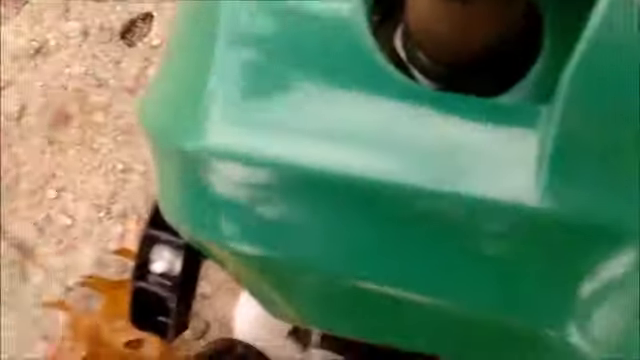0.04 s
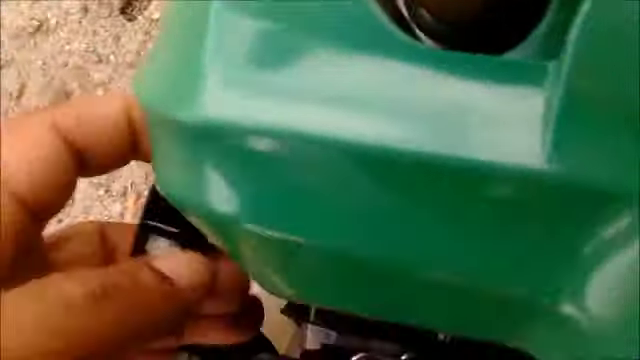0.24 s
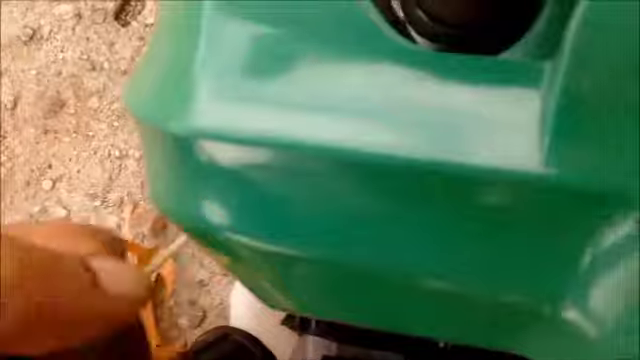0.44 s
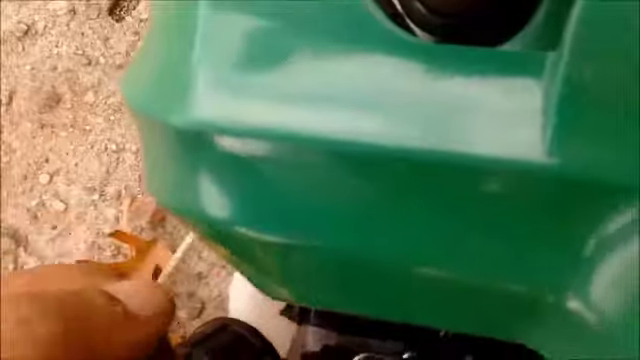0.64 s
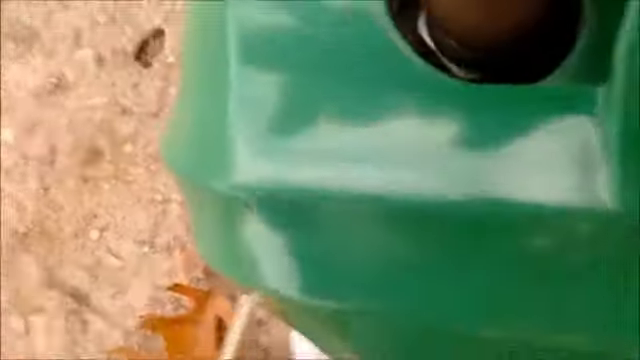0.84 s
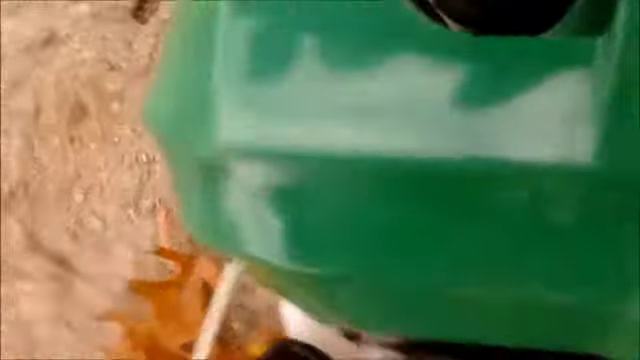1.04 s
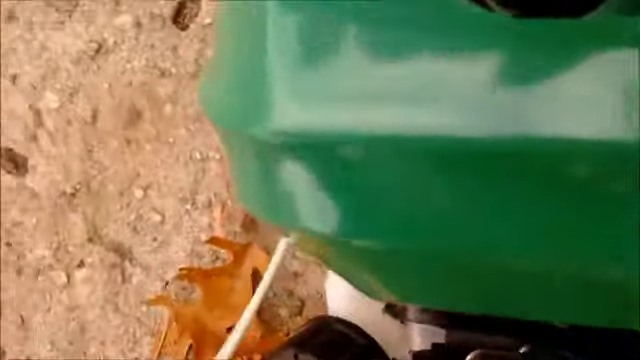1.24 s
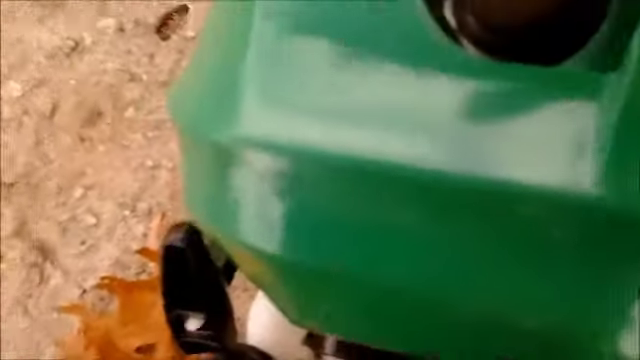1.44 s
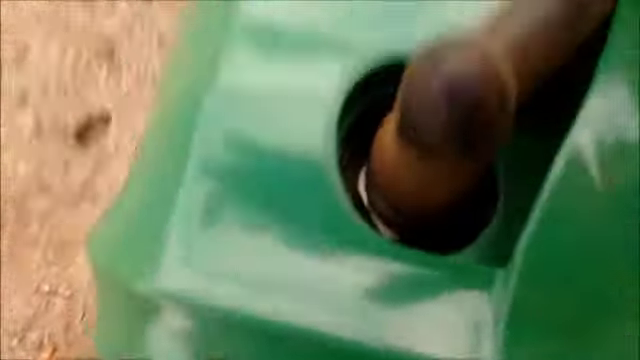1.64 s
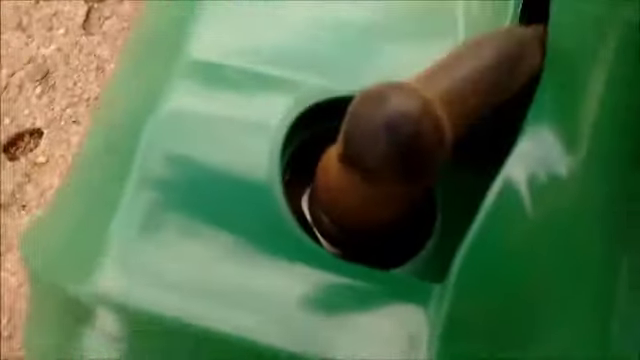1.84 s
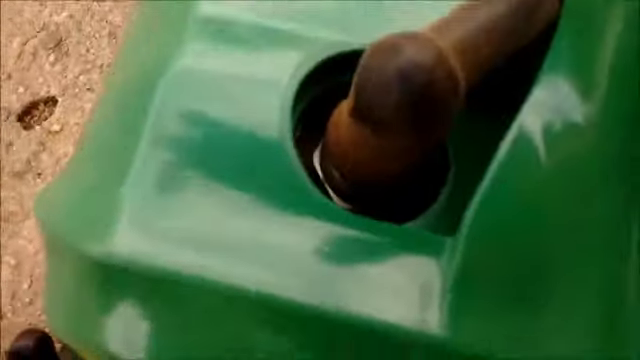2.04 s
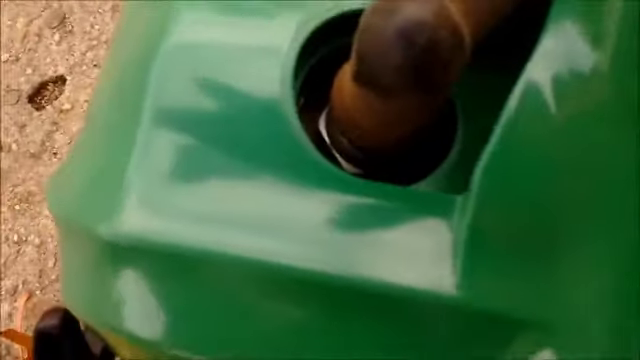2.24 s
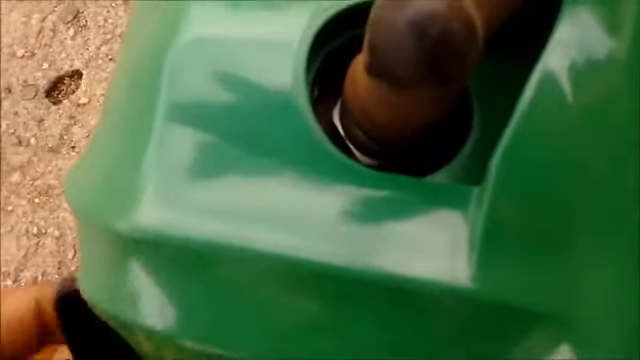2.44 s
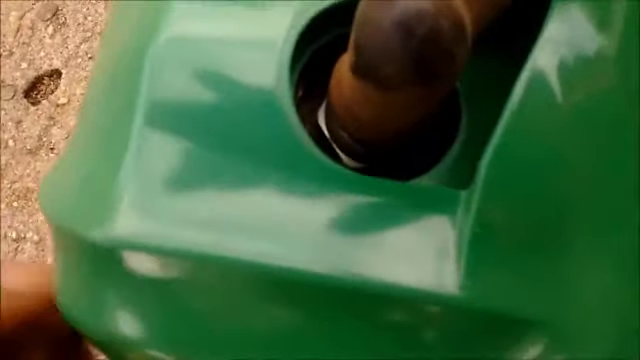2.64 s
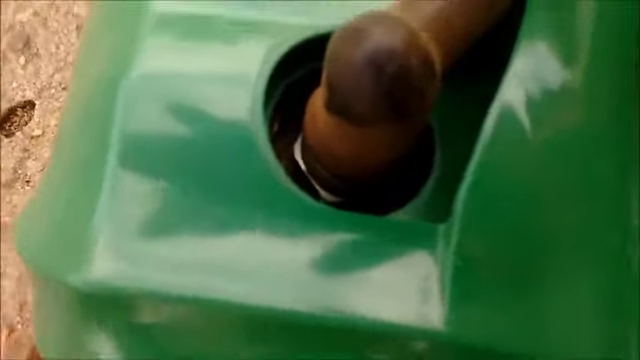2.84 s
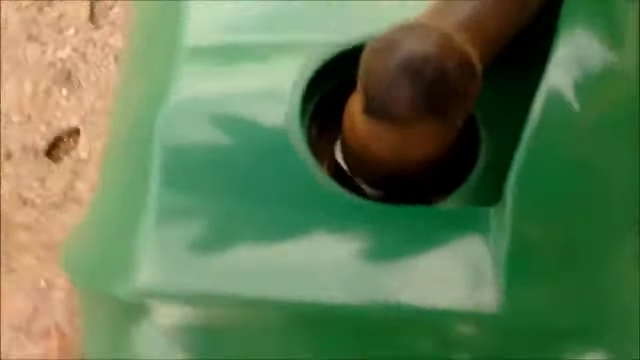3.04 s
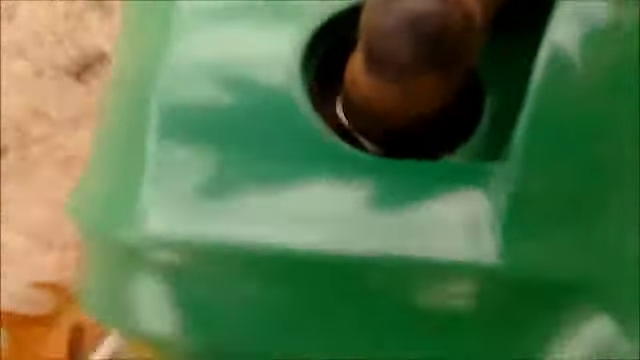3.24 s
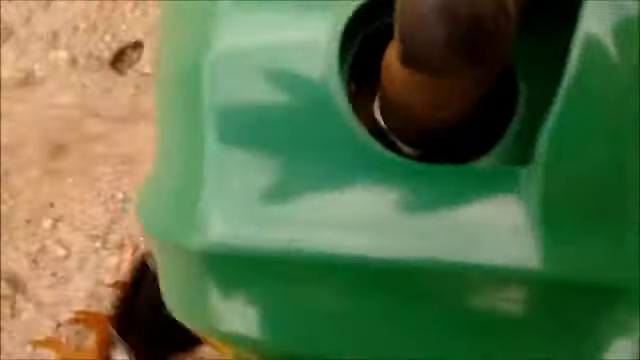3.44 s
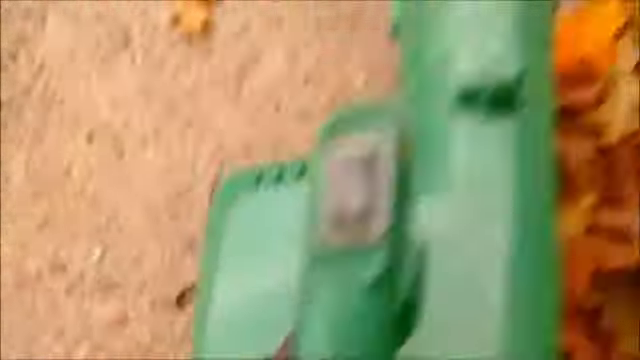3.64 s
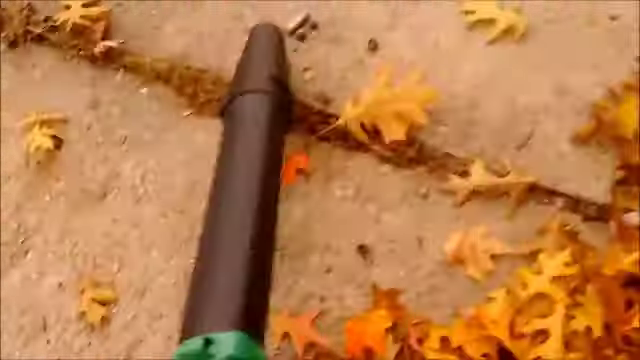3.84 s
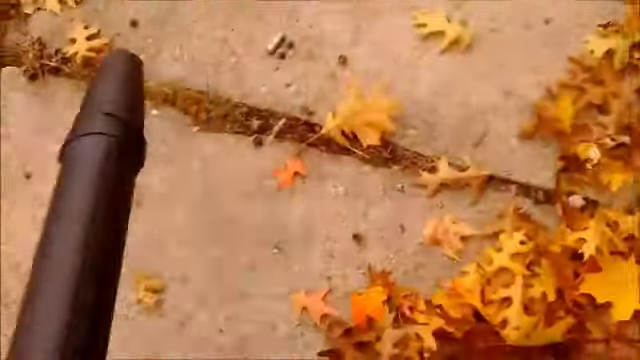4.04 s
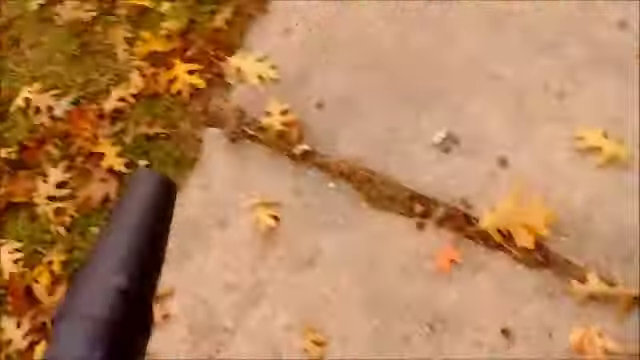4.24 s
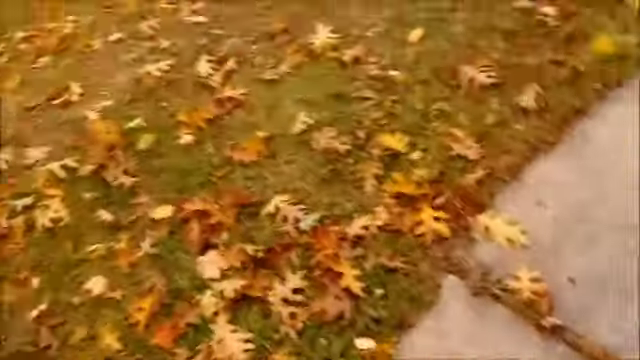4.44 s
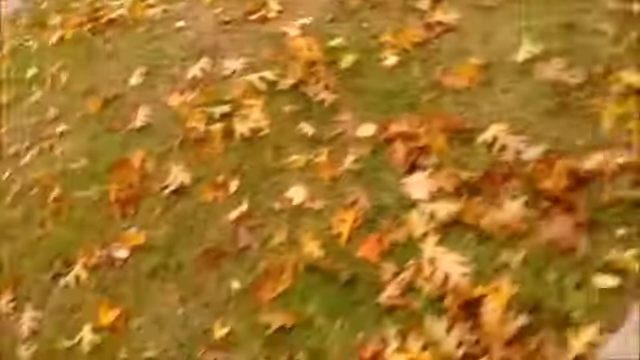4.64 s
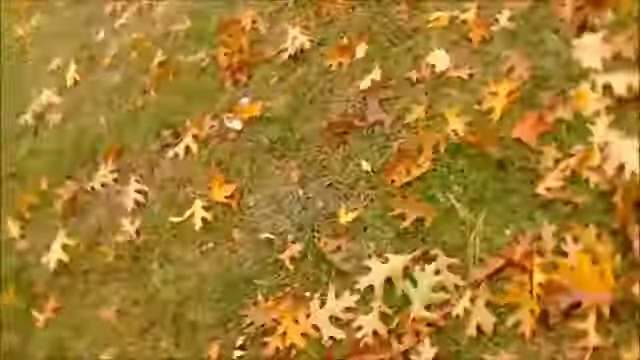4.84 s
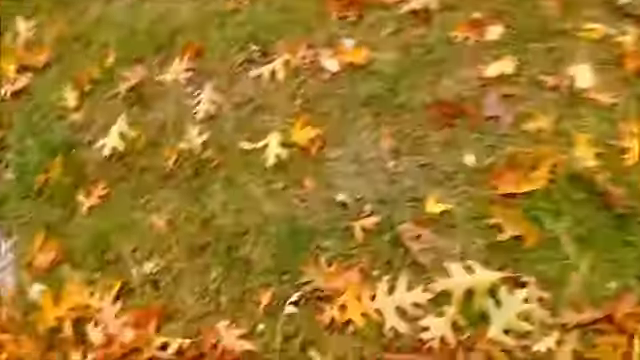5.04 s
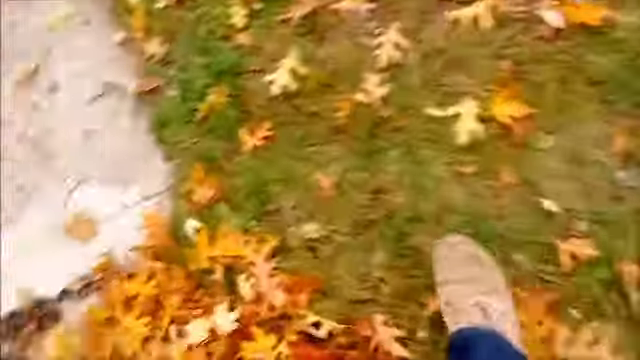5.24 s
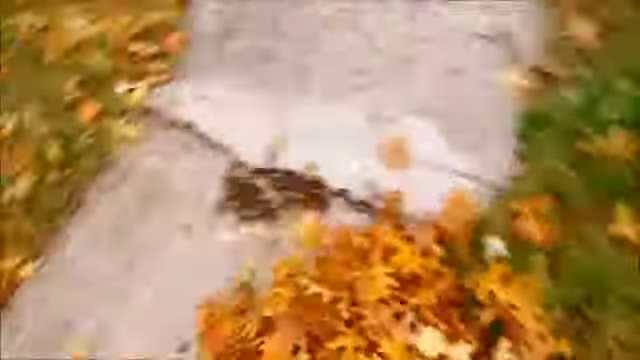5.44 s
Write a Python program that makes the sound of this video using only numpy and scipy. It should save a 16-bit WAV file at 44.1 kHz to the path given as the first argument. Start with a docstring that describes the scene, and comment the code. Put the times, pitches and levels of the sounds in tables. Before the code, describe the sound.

Plastic knocks, a ratcheting starter cord that coasts out and rewinds, then a second pull fires a small engine that climbs to a buzzing roar.

```python
"""Pull-starting a leaf blower

A small two-stroke leaf blower is pull-started on a concrete path, heard from very close.
A hand rubs the casing and takes the grip; the first pull spins the crank, which coasts to a stop while the
cord rewinds; the second pull catches, the engine stumbles, then revs up with its fan. A breeze buffets the
microphones. Pulses and blows ring resonances; air, rubbing and wind are shaped noise; the hum is sines."""
import sys
import numpy as np
from scipy import signal
from scipy.fft import rfft, irfft, next_fast_len
from scipy.io import wavfile
from scipy.ndimage import uniform_filter1d, map_coordinates

SR = 44100
rng = np.random.default_rng(int(sys.argv[2]) if len(sys.argv) > 2 else 0)


def wrap_up_sound(samples):
    """Save the sound to the file named by the first command line argument, as 16-bit audio."""
    columns = np.atleast_2d(samples).T
    # keep every value between -1 and 1, then stretch to whole-number steps
    tamed = np.clip(columns, -1, 1)
    steps = np.round(tamed * 32767).astype(np.int16)
    wavfile.write(sys.argv[1], SR, steps)


N = 242550   # samples, 5.5 s

# Crank speed, one list for each pull, its first row falling on a port opening.
# Each row: time in seconds, speed in turns per second.
CRANK = [
    [(1.191, 42), (1.26, 37), (1.35, 36), (1.43, 31), (1.585, 28)],
    [(3.167, 40), (3.34, 42), (3.433, 44), (3.562, 49), (3.756, 54), (4.072, 60), (4.152, 64), (4.212, 70),
     (4.35, 75.5), (4.45, 78), (4.65, 81.8), (4.85, 84.5), (4.95, 81.5), (5.05, 79.5), (5.15, 79),
     (5.25, 75.7), (5.5, 71.5)],
]
# Single low thumps: slow turns of the crank, starts and stops of a pull, and one late gust-like thud.
# Each row: time in seconds, strength of the pulse in dB.
LOW_THUMPS = [(0.983, 6), (1.019, 7), (1.067, -1), (1.118, -11), (1.168, -1), (1.481, 10), (1.658, -12),
              (1.753, -8.5), (1.867, -9), (1.981, -5.5), (2.113, -5), (2.205, -11), (3.096, 6.5),
              (3.137, -7), (5.397, -1)]
# The two pulls on the cord. Each row: second of full load, second of the cord stop, rumble level in dB,
# roar level in dB, hiss level in dB.
PULLS = [(1.038, 1.498, -20.5, -19, -19.5), (3.132, 3.54, -18.5, -23, -19.5)]
# Three settings of the exhaust pulses, each for the crank pulled, coasting and firing, in dB:
# strength, unevenness from turn to turn, and how far strong and weak turns alternate.
PULSE_DB = (-3, -10, -14)
UNEVEN_DB = (1.5, 1, 3.3)
ALTERNATE_DB = (0, 0, 3.5)


def port_openings():
    """One click per crank turn, as the piston uncovers the exhaust port, and one for each single low thump."""
    t = np.arange(N) / SR
    # 0 is pulled, 1 is coasting, 2 is firing
    state = np.select([t > PULLS[1][1], t > PULLS[1][0], t > PULLS[0][1]], [2, 0, 1], 0)
    strength_db, uneven_db, alternate_db = (np.take(db, state) for db in (PULSE_DB, UNEVEN_DB, ALTERNATE_DB))
    clicks, chance = np.zeros(N), rng.standard_normal(N)
    for rows in CRANK:
        turns = np.cumsum(in_time(rows, 0)[0]) / SR
        at = np.flatnonzero(np.diff(np.ceil(turns))) + 1
        strong_weak = (-1) ** np.arange(len(at))
        by_chance = uneven_db[at] * np.clip(chance[at], -2, 1)
        clicks[at] = from_db(strength_db[at] + by_chance + alternate_db[at] * strong_weak)
    for s, db in LOW_THUMPS:
        clicks[round(s * SR)] = from_db(db)
    return clicks


# Resonances of the muffler. Each row: pitch in Hz, width in Hz, level in dB before a shared 4 dB cut.
MUFFLER = [(160, 90, -2), (250, 130, -1), (420, 160, -12), (580, 200, -11)]
# Tone of the hissing air. Each row: frequency in Hz, relative strength in dB per Hz.
AIR_COLOUR = [(580, -13.5), (900, -9.5), (1600, -7.5), (3200, -13.5), (5000, -15), (8000, -22.5),
              (15000, -34)]
# Tone of the roar. Each row: frequency in Hz, relative strength in dB per Hz.
ROAR_COLOUR = [(40, -21), (120, 1.5), (220, 1.5), (400, -3.5), (600, -3.5), (900, -12)]
TURN_THROB, TURN_THROB_S = .9, .003   # each port opening pushes the hiss up: added gain, decay time


def engine(clicks):
    """Port pulses ring the muffler, each with a spit of hiss; the air flow throbs with the turns."""
    opening = uniform_filter1d(clicks, size=25)   # the port takes about half a millisecond to open
    thump = sum(from_db(db - 4) * ring(-opening, hz, 2.2 / width) for hz, width, db in MUFFLER)
    thump = signal.lfilter(*signal.butter(2, 110, "high", fs=SR), thump)   # a small outlet radiates little bass

    spit_gain = signal.lfilter([1], [1, -np.exp(-1 / (0.0015 * SR))], clicks)
    spit = from_db(-31.0) * spit_gain * coloured(rng.standard_normal((2, N)), AIR_COLOUR)

    push = signal.lfilter([TURN_THROB], [1, -np.exp(-1 / (TURN_THROB_S * SR))], clicks > 0)
    throb = from_db(1.2 * drift(10) + 1.5 * drift(100)) * (.8 + push)
    roar_gain, hiss_gain = air_flow()
    opposed = 0.88 * rng.standard_normal(N) * [[1], [-1]]   # turned over at the second port
    roar_noise = coloured(rng.standard_normal((2, N)) + opposed, ROAR_COLOUR)
    roar = roar_gain * from_db(2.5 * drift(9)) * roar_noise
    hiss = hiss_gain * throb * coloured(grainy(9000, 1.9), AIR_COLOUR)
    return thump * [[1], [-.8]] + hum() + spit + roar + hiss


# Level of each multiple of the crank speed, in dB, in a plain list from the first multiple up.
HUM_ORDERS_DB = [-9, -2, -3, -14, -11, -14, -7, -9, -9, -6, -9, -8, -11, -10, -11, -12]
HUM_DB, HUM_TURNS_PER_S = -31, 80   # level of the hum at this crank speed
HUM_DB_PER_TURN = .7   # gain in dB for each turn per second more
HUM_PORT_STEP = .009   # radians, times the multiple squared, by which the ports come into step


def hum():
    """Clean multiples of the crank speed, each swelling and sinking on its own; louder as the speed rises."""
    speed, = in_time(CRANK[1], 0)
    angle = 2 * np.pi * np.cumsum(speed * (1 + .006 * drift(12))) / SR   # the speed wavers a little
    swing = [from_db(db + 5 * drift(8)) for db in HUM_ORDERS_DB]
    tones = np.zeros((2, N))
    for k, gain in enumerate(swing, start=1):
        port_phase = [[0], [np.pi - k ** 2 * HUM_PORT_STEP]]
        tones += gain * np.sin(k * angle + rng.uniform(0, 2 * np.pi) + port_phase)
    return from_db(HUM_DB + HUM_DB_PER_TURN * (speed - HUM_TURNS_PER_S)) * tones


# Fan and turbulent exhaust flow once the engine fires.
# Each row: time in seconds, roar level in dB, hiss level in dB.
AIR = [(3.55, -21.5, -23), (3.7, -28, -26.5), (3.95, -58, -38), (4.3, -55, -28.5), (4.5, -24.5, -26.5),
       (4.7, -27, -24.5), (4.85, -31, -25.5), (5.0, -29.5, -29), (5.2, -23.5, -27), (5.5, -22, -27.5)]
# Air while the crank coasts. One row: roar level in dB, hiss level in dB, fading of the hiss in dB per second.
COAST = (-39.5, -37.5, 8)


def air_flow():
    """Gains of roar and hiss: air moves while the cord is pulled, while coasting, then while firing."""
    roar_db, hiss_db, fading = COAST
    roar, hiss = from_db(in_time(AIR, -99))
    roar = roar + pulled(column=3, sag=9.9) + coasting(roar_db)
    hiss = hiss + pulled(column=4, sag=13.8) + coasting(hiss_db, fading)
    return roar, hiss


PULL_RISE_DB_PER_S = 295
CUT_DB_PER_S = 600   # how fast a pull ends and the next phase sets in


def pulled(column, sag):
    """Gain of one level column of the pulls, sagging in dB per second until the cord stops."""
    return sum(swell(row[0], row[1], row[column], PULL_RISE_DB_PER_S, CUT_DB_PER_S, sag) for row in PULLS)


COAST_END_S = 2.22   # after the first pull the crank coasts and the cord rewinds until then


def coasting(db, fading=0):
    """Gain of a layer that lasts from the first cord stop until the crank rests."""
    return swell(PULLS[0][1], COAST_END_S, db, CUT_DB_PER_S, CUT_DB_PER_S / 2, fading)


# Short bright puffs of air, during the pulls and the slow turns between.
# Each row: second of the loudest moment, level in dB.
PUFFS = [(1.09, -23), (1.33, -28), (1.635, -34), (1.728, -30.5), (1.836, -25.5), (1.951, -25.5),
         (2.08, -24), (2.146, -23), (3.152, -20.5), (3.251, -20), (3.329, -26), (3.398, -24), (3.46, -22.5)]
# Tone of the puffs. Each row: frequency in Hz, relative strength in dB per Hz.
PUFF_COLOUR = [(3000, 4), (5000, 10.5), (8000, 11.5), (11000, 5), (15000, 2)]
PUFF_S = 0.0094   # half length of a puff


def puffs():
    """Short bright puffs of air, each a smooth swell of grainy noise."""
    t = np.arange(N) / SR
    puff_gain = sum(from_db(db) * np.exp(-((t - s) / PUFF_S) ** 2) for s, db in PUFFS)
    return puff_gain * coloured(grainy(14000, 0.71), PUFF_COLOUR)


# Resonances of the casing. Each row: pitch in Hz, level in dB, free decay by 60 dB in seconds.
CASING = [(820, -5, 0.037), (1186.4, -5.5, 0.084), (1389, -10, 0.075), (1404, -12, 0.15), (1667, -1, 0.019),
          (2076, -13, 0.11), (2690, -4, 0.055), (3400, -15, 0.049), (4580, -10, 0.035)]
# Resonances of the spring. Each row: pitch in Hz, level in dB, free decay by 60 dB in seconds.
SPRING = [(4520, -2, 0.038), (4740, -5, 0.14), (4906, 1.5, 0.029), (4954, -8, 0.05), (5260, 0.5, 0.032)]
# Tone of the whirr. Each row: frequency in Hz, relative strength in dB per Hz.
WHIRR_COLOUR = [(2500, 10), (3600, 14), (4700, 9.5), (5200, 18), (6200, -2), (8500, 8.5), (11000, 4.5),
                (15000, -53)]
# Short bright slips of pawl and spring, during the rewind and around the second pull.
# Each row: time in seconds, peak level in dB, pitch in Hz.
SLIPS = [(1.628, -31.5, 4550), (1.707, -37, 4760), (1.779, -27.5, 4440), (1.827, -37, 4580),
         (1.889, -27, 5160), (1.923, -37, 5070), (1.943, -36, 5070), (2.0109, -26.5, 5300),
         (2.04, -29, 4360), (2.056, -32, 4700), (2.077, -24.5, 4630), (2.142, -22, 4600),
         (2.231, -33.5, 4700), (2.791, -40.5, 5100), (2.8013, -37, 4500), (3.0563, -16, 4970),
         (3.1178, -18, 4800), (3.1508, -26, 4900)]
# The ratchet catches and jars the casing.
# Each row: time in seconds, peak level in dB, pitch of the part struck in Hz.
CATCHES = [(1.054, -11, 1470), (1.112, -10, 850), (1.135, -8.5, 844), (1.161, -10, 780), (1.183, -8.5, 785),
           (1.202, -15, 1370), (1.231, -18, 1180), (1.256, -16.5, 1200), (1.277, -27, 1190),
           (1.336, -7.5, 1310), (1.37, -11.5, 825), (1.44, -19, 1230), (1.536, -25, 1420),
           (1.746, -31, 1440), (1.814, -24.5, 1400), (1.926, -22.5, 1400), (1.944, -22, 1390),
           (1.974, -23, 1440), (2.054, -22.5, 1440), (2.105, -19.5, 1460), (3.152, -13, 1170),
           (3.178, -8.5, 1040), (3.205, -7, 1120), (3.253, -8, 1440), (3.274, -17, 1360),
           (3.522, -20, 1360), (3.538, -24, 1190)]
SLIP_T60_S, SLIP_RING_DB = 0.067, -3   # fading of a slip; the spring's ring relative to the slip's peak
CATCH_CHATTER_S = 0.001   # how long the contact rattles
CATCH_RASP_DB, CATCH_RASP_T60_S = -6, .06   # burst let out by a catch: level relative to its peak, fading
PULL_WHIRR_DB = -5.5   # whirr relative to the rumble
TURN_SHAKE, TURN_SHAKE_S = .4, 0.0074   # each exhaust pulse shakes the starter: added gain, decay time


def starter(clicks):
    """Cord and pawls rattle the casing and set the spring whirring; single slips stand out."""
    rumble_gain, whirr_gain = cord()
    rubbing, ticking = grainy(500, 3.5), grainy(1800, 3.5)
    rattling = sum(from_db(db + 2.95 * drift(34.0)) * ring(rubbing, hz, 0.28 * t60) for hz, db, t60 in CASING)
    rumble = at_ports(rms_one(rattling))
    singing = sum(from_db(db + 12.0 * drift(9.6)) * ring(ticking, hz, .5 * t60) for hz, db, t60 in SPRING)
    whirr = coloured(ticking, WHIRR_COLOUR) + from_db(-3) * rms_one(singing)
    shake = signal.lfilter([TURN_SHAKE], [1, -np.exp(-1 / (TURN_SHAKE_S * SR))], np.minimum(clicks, 1))
    uneven = from_db(2.2 * drift(40)) * (0.6 + shake)

    s, peak_db, hz = np.transpose(SLIPS)
    slips = bursts(s, peak_db, SLIP_T60_S, attack_s=0.0016) * whirr
    slips = slips + strike(s, peak_db + SLIP_RING_DB, hz, SPRING, 5.5, focus_db=42,
                           chatter_s=CATCH_CHATTER_S, detune=0.0124)
    s, peak_db, hz = np.transpose(CATCHES)
    catches = at_ports(strike(s, peak_db, hz, CASING, 0.69, focus_db=39,
                              chatter_s=CATCH_CHATTER_S, detune=0.0425))
    rasp_gain = bursts(s, peak_db + CATCH_RASP_DB, CATCH_RASP_T60_S, attack_s=0.0017)
    rasps = rasp_gain * (rumble + from_db(PULL_WHIRR_DB) * whirr)
    return uneven * (rumble_gain * rumble + whirr_gain * whirr) + slips + catches + rasps


# Jolts through the taut cord. Each row: time in seconds, rumble level in dB, whirr in dB relative to the rumble.
JOLTS = [(0.98, -17, 2), (1.487, -12, -9.5), (3.065, -36.5, 9.5), (3.1, -24.5, 1.5), (3.282, -16.5, -39),
         (3.542, -17.5, -23), (3.592, -15, -18)]
JOLT_RISE_DB_PER_S, JOLT_FALL_DB_PER_S = 345, 616
# The cord winds back in jerks, each swelling and breaking off.
# Each row: second of the break, rumble level in dB, whirr in dB relative to the rumble.
REWIND = [(1.652, -26, -16), (1.755, -29, -1), (1.867, -23.5, -0.5), (1.974, -27.5, -2), (2.071, -33, -10),
          (2.117, -28.5, -4), (2.209, -33, 2), (2.335, -32, -7.5)]
REWIND_RISE_DB_PER_S, REWIND_FALL_DB_PER_S = 210, 1198
# Steady rattle under the jerks.
# One row: rumble level in dB, whirr in dB relative to the rumble, fading in dB per second.
RATTLE = (-30, -8, 45)
# After the second pull the cord runs back in one go.
# One row: rumble level in dB, whirr in dB relative to the rumble, fading in dB per second.
RUN_BACK = (-22, -3.5, 26.4)


def cord():
    """Gains of rumble and whirr as the cord is pulled, jolts, rewinds in jerks and runs back."""
    parts = [(pulled(column=2, sag=6), PULL_WHIRR_DB)]
    db, whirr_db, fading = RUN_BACK
    stop = PULLS[1][1]
    parts += [(swell(stop, stop, db, CUT_DB_PER_S, fading), whirr_db)]
    db, whirr_db, fading = RATTLE
    parts += [(coasting(db, fading), whirr_db)]
    for s, db, whirr_db in JOLTS:
        parts += [(swell(s, s, db, JOLT_RISE_DB_PER_S, JOLT_FALL_DB_PER_S), whirr_db)]
    for s, db, whirr_db in REWIND:
        parts += [(swell(s, s, db, REWIND_RISE_DB_PER_S, REWIND_FALL_DB_PER_S), whirr_db)]
    rumble_gain = sum(gain for gain, _ in parts)
    whirr_gain = sum(gain * from_db(whirr_db) for gain, whirr_db in parts)
    return rumble_gain, whirr_gain


# Knocks of grip and cord stop on the casing.
# Each row: time in seconds, peak level in dB, pitch of the part struck in Hz, crack level in dB.
KNOCKS = [(0.336, -13, 1450, -18), (0.429, -20.5, 1400, -46), (0.484, -13, 1380, -35),
          (0.509, -17, 1400, -40), (0.519, -0.5, 1200, -40), (0.905, -31, 1200, -63),
          (0.968, -3.5, 1560, -15), (1.015, -0.5, 815, -54), (1.087, -3.5, 1130, -14),
          (1.48, 1.5, 1120, 2.5), (1.617, -18.5, 1390, -26), (2.192, -14.5, 1400, -35),
          (2.226, -22, 1400, -41), (2.32, -22, 1420, -36), (2.59, -32, 1320, -51),
          (2.637, -15.5, 2700, -33.5), (2.755, -27.5, 850, -58), (2.89, -35.5, 910, -62),
          (2.99, -2.5, 1070, -24.5), (3.09, -8, 1390, -13.5), (3.585, 4.5, 1140, 3.5),
          (3.633, -5.5, 1200, -19)]
# Tone of skin on plastic and of the cracks. Each row: frequency in Hz, relative strength in dB per Hz.
SKIN_COLOUR = [(800, 0), (1300, 4), (2000, 1), (2500, 6), (3200, 8), (6000, -0.5), (8000, 5), (11000, -2.5),
               (15000, -10)]
KNOCK_RING = .3   # the held casing rings only this share of its free decay
KNOCK_CHATTER_S, CRACK_T60_S = 0.0014, 0.028   # how long the contact rattles; fading of the crack


def knocks():
    """Plastic on plastic: the casing rings briefly under a short broad crack."""
    s, peak_db, struck_hz, crack_db = np.transpose(KNOCKS)
    crack = bursts(s, crack_db, CRACK_T60_S, attack_s=0.0016) * coloured(grainy(15000, 0.29), SKIN_COLOUR)
    held = [(hz, db, KNOCK_RING * t60) for hz, db, t60 in CASING]
    rings = strike(s, peak_db, struck_hz, held, 1.9, focus_db=11, chatter_s=KNOCK_CHATTER_S, detune=0.047)
    return at_ports(rings) + crack


# Skin sliding over plastic; the first stroke takes two overlapping rows, a fine hiss and a dull scrub.
# Each row: start and end of full strength in seconds, hiss level in dB, dull scrub level in dB,
# rise in dB per second, fall in dB per second.
HAND = [(0.252, 0.315, -20.5, -36, 170, 280), (0.283, 0.295, -40, -27, 250, 300),
        (0.455, 0.5, -27, -39, 300, 220), (0.95, 0.967, -41, -55, 269, 905),
        (2.597, 2.65, -60, -50, 294, 298), (2.763, 2.83, -50, -57, 293, 304.5)]


def hand():
    """Fingers slide over the casing: a fine hiss and a dull scrub."""
    bright, dull = (sum(swell(row[0], row[1], row[k], *row[4:]) for row in HAND) for k in (2, 3))
    hiss = coloured(grainy(7400, 0.81), SKIN_COLOUR)
    scrub_colour = [(60, -3), (130, 11), (300, 5.0), (550, 10), (1100, 0)]   # (Hz, dB per Hz)
    scrub = coloured(rng.standard_normal(N), scrub_colour) * [[1], [-.8]]
    return from_db(1.4 * drift(34)) * (bright * hiss + dull * scrub)


# Wind on the microphone ports. Each row: time in seconds, middle level in dB.
WIND = [(0, -52), (.3, -45), (.7, -46), (1.1, -36), (1.7, -43), (2.1, -41), (2.3, -34), (2.45, -37.5),
        (2.6, -35), (3, -36), (3.4, -30), (3.8, -43), (5.5, -48)]
# Tone of the far hiss. Each row: frequency in Hz, relative strength in dB per Hz.
OUTDOORS = [(300, 13), (600, 9), (1200, 12), (3000, 3), (5000, 0), (6500, -12), (10000, 0.5), (15000, -114)]
OUTDOORS_DB = -52   # level of the far hiss


def outdoors():
    """Lumpy wind, its own deep noise at each port, over a faint far hiss."""
    wind_colour = [(20, -19), (60, 19.0), (130, 22.0), (220, 9.0), (350, -11.0), (500, -38.0)]   # (Hz, dB per Hz)
    lumps = coloured(rng.standard_normal((2, N)), wind_colour)
    wind = from_db(in_time(WIND)[0] + 3.5 * drift(14) + 1.5 * drift(4)) * lumps
    return wind + from_db(OUTDOORS_DB) * coloured(rng.standard_normal((2, N)), OUTDOORS)


def from_db(db):
    """Gain of a level in dB."""
    return np.exp(np.log(10) / 20 * np.asarray(db))


def rms_one(x):
    """Scaled to rms 1."""
    return x / np.sqrt(np.mean(x ** 2) + 1e-20)


def in_time(rows, outside=None):
    """Each column after the time as a curve over all samples."""
    s, *columns = np.transpose(rows)
    return [np.interp(np.arange(N) / SR, s, c, outside, outside) for c in columns]


def swell(start, stop, db, rise, fall, sag=0):
    """Gain that climbs to db at start, sags until stop, then falls; slopes in dB per second."""
    t = np.arange(N) / SR
    before, during, after = np.maximum(start - t, 0), np.clip(t - start, 0, stop - start), np.maximum(t - stop, 0)
    return from_db(db - rise * before - sag * during - fall * after)


def bursts(times, level_db, t60, attack_s):
    """Envelope that rises quickly at each time and dies away."""
    out = np.zeros(N)
    for s, db in zip(times, level_db):
        after = np.arange(N - round(s * SR)) / SR
        out[N - len(after):] += from_db(db - 60 * after / t60) * np.minimum(after / attack_s, 1)
    return out


def drift(rate):
    """Slow chance of spread 1, changing about rate times a second."""
    r = np.exp(-2 * np.pi * rate / SR)
    # the first second lets the filter settle
    return rms_one(signal.lfilter([1], [1, -2 * r, r * r], rng.standard_normal(N + SR))[SR:])


def coloured(x, colour):
    """x shaped by a spectrum of (Hz, dB) rows, rms 1."""
    size, (hz, db) = next_fast_len(N), np.transpose(colour)
    f = np.arange(size // 2 + 1) * SR / size + 1
    # flat below the first row, 35 dB lower beyond the last
    gain = from_db(np.interp(np.log(f), np.log(hz), db, db[0], db[-1] - 35))
    return rms_one(irfft(rfft(x, size) * gain, size)[..., :N])


def grainy(per_s, spread_db):
    """Random clicks of uneven size, unrelated at the two ports, rms 1."""
    sizes = from_db(spread_db * np.minimum(rng.exponential(1, (2, N)), 4)) * rng.choice([-1, 1], (2, N))
    return rms_one(sizes * (rng.random((2, N)) < per_s / SR))


def ring(clicks, hz, t60):
    """A resonance: a unit click sets a dying sine of starting height 1 ringing."""
    r, w = from_db(-60 / (t60 * SR)), 2 * np.pi * hz / SR
    return signal.lfilter([0, np.sin(w)], [1, -2 * r * np.cos(w), r * r], clicks + 1e-18)


def strike(times, level_db, struck_hz, modes, spread_db, focus_db, chatter_s, detune):
    """Each blow favours the modes near its own pitch, bends them a little, and differs in strength at each port."""
    out, t = np.zeros((2, N + SR)), np.arange(SR // 6) / SR
    hz, mode_db, t60 = np.transpose(modes)[..., None]
    first = t[:SR // 50]
    contact = np.sqrt(first) * np.exp(-first / chatter_s)   # the contact builds up and rattles briefly
    for s, db, pitch in zip(times, level_db, struck_hz):
        chance = rng.standard_normal((4, len(modes), 1))
        bent = hz * (1 + detune * chance[3])
        # focus_db is lost per octave away from the part struck
        own_db = db + mode_db - focus_db * abs(np.log2(hz / pitch)) + spread_db * chance[:2]
        push = 2 * np.cos(2 * np.pi * bent * first) / contact.sum()
        scratch = rng.standard_normal(len(first)) / np.linalg.norm(contact)
        chatter = contact * (push + scratch)
        sines = from_db(-60 * t / t60) * np.sin(2 * np.pi * bent * t)
        rings = signal.fftconvolve(sines, chatter, axes=1)[:, :len(t)]
        out[:, round(s * SR):][:, :len(t)] += np.sum(from_db(own_db) * np.sign(chance[2]) * rings, axis=1)
    return out[:, :N]


PORTS_ALIKE, PORTS_APART = 0.46, 1.68   # share common to both ports; radians by which the right one lags


def at_ports(x):
    """Both ports share part of a sound, the right one shifted in phase."""
    shifted = np.real(signal.hilbert(x[0]) * np.exp(-1j * PORTS_APART))
    return np.array([x[0], PORTS_ALIKE * shifted + np.sqrt(1 - PORTS_ALIKE ** 2) * x[1]])


def scene():
    """Sound pressure at the two microphone ports."""
    clicks = port_openings()
    return engine(clicks) + puffs() + starter(clicks) + knocks() + hand() + outdoors()


# The two capsules differ in colour. Each row: frequency in Hz, left over right in dB.
LEFT_OVER_RIGHT = [(60, 1), (120, 0.5), (240, 1.5), (480, -1.5), (950, 4.5), (1890, 2), (3770, 4),
                   (7520, 0), (15000, 4)]
# Low and high edge, in Hz, of the band that is widened.
WIDEN_HZ = (232, 1040)
WIDEN = 0.72   # added share of the left-right difference
PORT_LAG_SAMPLES, PORT_CROSS, CROSS_CUT_HZ = 13.09, 0.51, 5600   # the other port: delay, share, treble cut
CUTOFF_HZ = 15900   # nothing much is left above this


def record(dry):
    """Each channel is one port minus the delayed other one, aiming it sideways; low mids widened, peaks rounded."""
    delayed = np.tile(np.arange(N) - PORT_LAG_SAMPLES, (2, 1))
    late = map_coordinates(dry[::-1], [np.repeat([[0], [1]], N, axis=1), delayed], order=1)
    late = signal.lfilter(*signal.butter(1, CROSS_CUT_HZ, fs=SR), late)
    aimed = (dry - PORT_CROSS * late) / np.sqrt(2)

    side = signal.lfilter(*signal.butter(1, WIDEN_HZ, "band", fs=SR), aimed[0] - aimed[1]) / 2
    wide = aimed + WIDEN * side * [[1], [-1]]
    hz, db = np.transpose(LEFT_OVER_RIGHT)
    lean = np.interp(np.log(np.arange(N // 2 + 1) * SR / N + 1), np.log(hz), db) / 2   # half to each channel
    wide = irfft(rfft(wide) * from_db([lean, -lean]), N)

    wide = signal.lfilter(*signal.butter(1, 45, "high", fs=SR), wide)   # small capsules lose the deepest bass
    return signal.sosfilt(signal.cheby2(14, 70, CUTOFF_HZ, fs=SR, output="sos"), np.tanh(wide))


dry = scene()
out = record(dry)
wrap_up_sound(out)
```